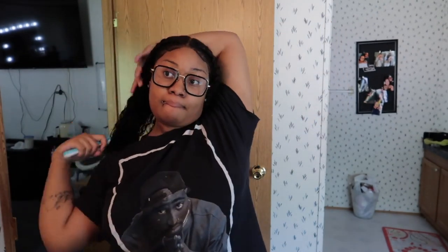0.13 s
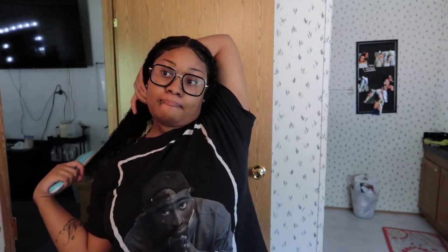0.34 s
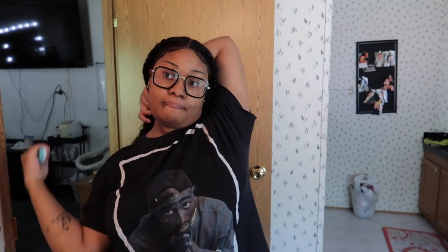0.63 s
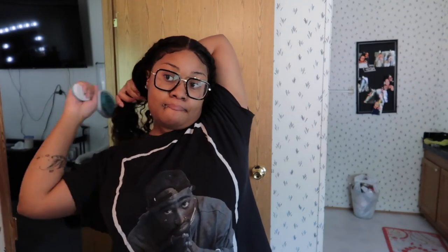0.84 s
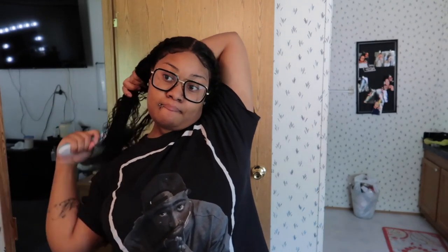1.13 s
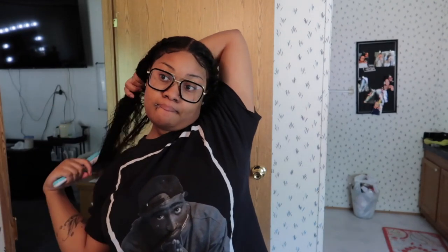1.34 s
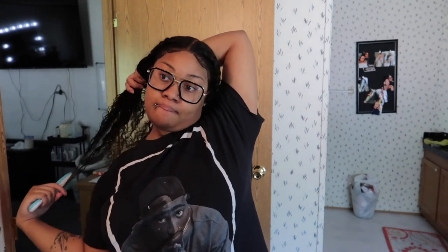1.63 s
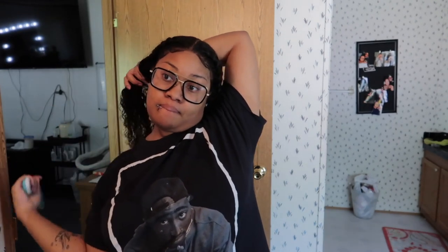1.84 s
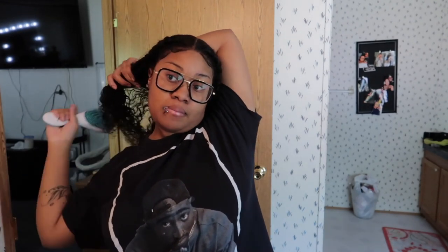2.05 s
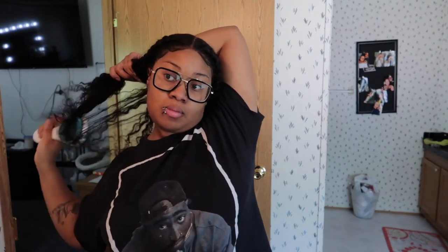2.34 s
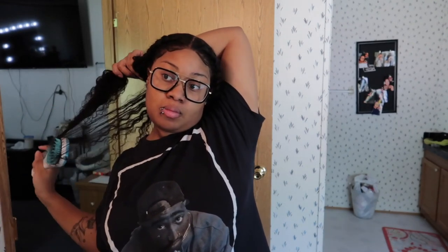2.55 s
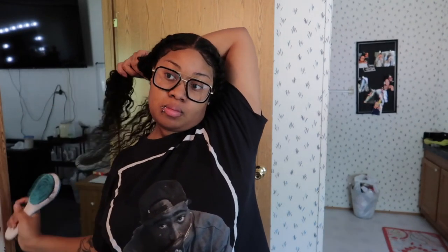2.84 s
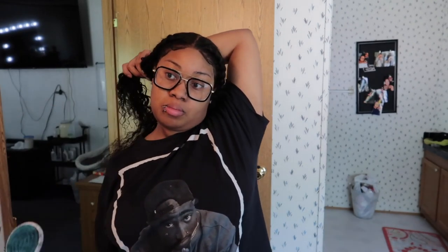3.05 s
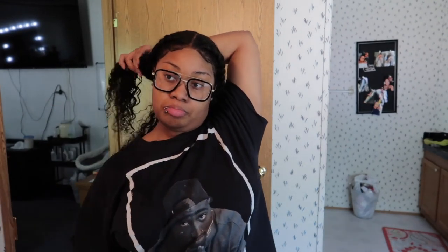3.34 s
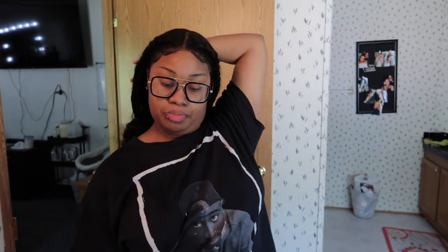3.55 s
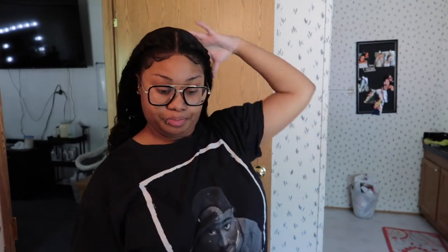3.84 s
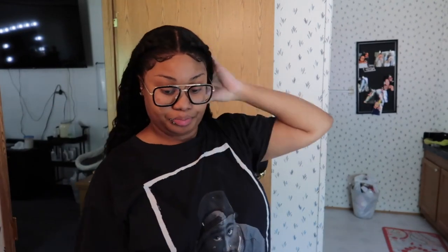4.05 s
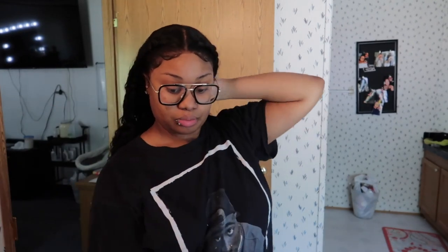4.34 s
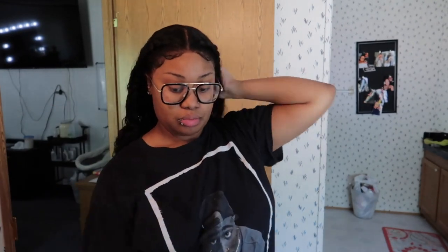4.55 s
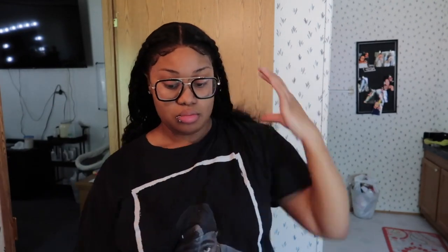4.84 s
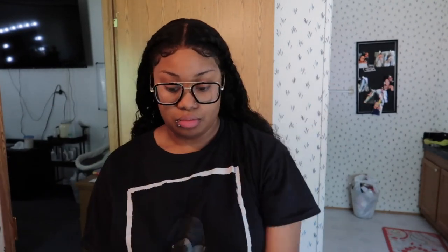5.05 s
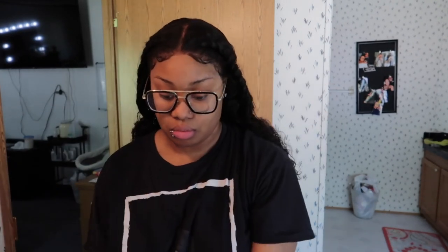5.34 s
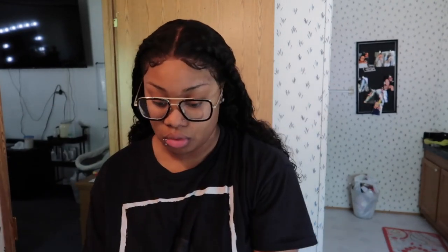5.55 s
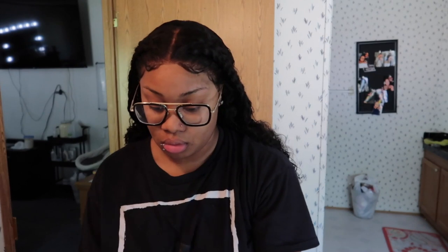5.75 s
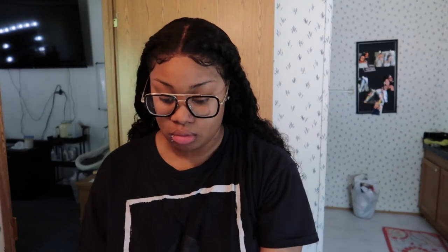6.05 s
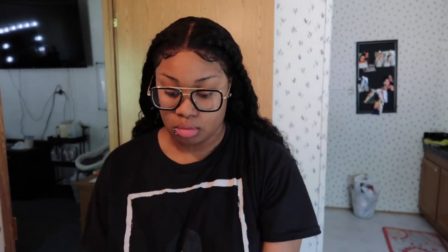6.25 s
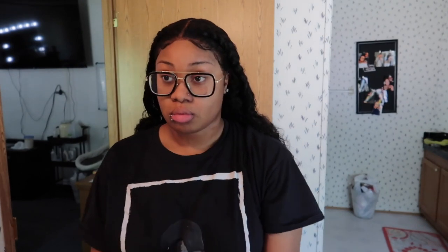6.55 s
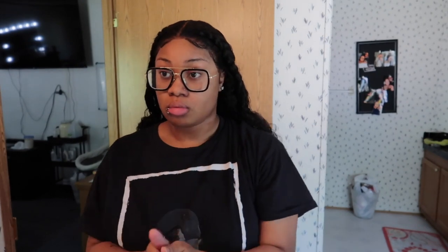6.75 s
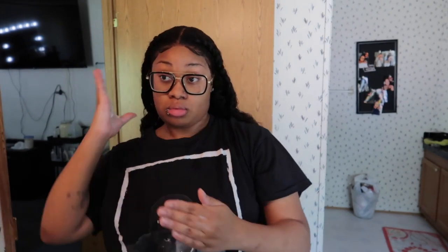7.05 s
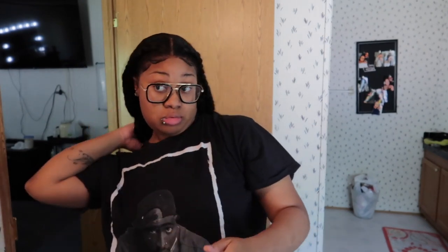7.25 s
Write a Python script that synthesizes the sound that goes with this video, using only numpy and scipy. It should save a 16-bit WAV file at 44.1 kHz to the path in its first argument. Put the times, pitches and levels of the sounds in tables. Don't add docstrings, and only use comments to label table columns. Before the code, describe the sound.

A brush rasps and snags through long hair in short strokes, clacks loudly onto a hard top, then a plastic bottle is tapped over low hum.

```python
import sys
import numpy as np
from scipy import signal
from scipy.fft import rfft, irfft, next_fast_len
from scipy.io import wavfile
from scipy.ndimage import map_coordinates

SR = 44100
rng = np.random.default_rng(int(sys.argv[2]) if len(sys.argv) > 2 else 0)


def materialize(psi):
    bounded = np.clip(np.atleast_2d(psi).T, -1, 1)
    quanta = np.round(bounded * 32767).astype(np.int16)
    wavfile.write(sys.argv[1], SR, quanta)


def boost_factor(decibels):
    exponent = np.asarray(decibels, float) / 20
    return 10 ** exponent


N = 325887

# full_grip_s, hold_s, scrape_db, body_re_scrape_db, hiss_re_scrape_db
BRUSH_PULLS = [(.03, .19, -53, 0.5, -4.5), (.322, 0.0087, -48.5, -9, -4.5), (.36, .015, -43.5, -18, -17),
               (.388, 0.0037, -44.5, 1.5, -3), (.42, 0.048, -54.5, 1, -9), (.974, 0.014, -49.5, -1, -5.5),
               (1.01, 0.17, -58.5, 2.5, -1), (1.22, 0.057, -48.5, -5, -5), (1.31, 0.068, -49, -0.5, -8.5),
               (1.386, 0.02, -40.5, -4.5, -13), (1.45, 0.034, -49.5, 2, -6), (1.53, .16, -56.5, -5, -11),
               (2.3, .01, -54.5, -13, -3), (2.338, 0.0087, -44, 0, -4), (2.365, 0.039, -47, 5, -14),
               (2.41, 0.035, -45, 4.5, -9), (2.48, 0.061, -55.5, 0, -6.5), (2.64, 0.029, -59.5, -5, -9),
               (2.698, .005, -51.5, -5, -3), (2.758, 0.014, -43.5, 1, -10), (4.006, 0.061, -65.5, 2, -10),
               (4.33, .005, -58, -7, -19)]
# center_hz, width_hz, level_db
BRISTLE_PEAKS = [(2450, 420, 12), (2900, 900, 12), (3395, 1060, 7), (1690, 710, 2)]
# center_hz, width_hz, level_db
PADDLE_PEAKS = [(650, 260, 0), (1050, 380, -2)]
# freq_hz, density_db_per_hz
HAIR_HISS = [(2240, -32), (3800, -12.5), (5080, -14), (5940, -14.5), (9400, -19.5), (12600, -18),
             (14400, -35), (15200, -67)]
# start_s, peak_db, pitch_hz, body_re_peak_db, body_hz
SNAGS = [(0.32, -50, 2700, -11, 560), (0.3674, -32, 2230, -2, 990), (0.385, -30, 2900, -9, 616),
         (0.9696, -55, 2500, -8, 950), (1.2185, -44, 2470, -14, 628), (1.3453, -37, 2750, 1, 610),
         (1.3997, -35, 2950, -2, 790), (1.4597, -34, 2900, -10, 910), (1.679, -39, 2456, -19, 740),
         (2.3077, -43, 2950, 6, 706), (2.3287, -28.5, 2800, -1, 730), (2.374, -29.5, 2330, -9, 960),
         (2.414, -30.5, 1640, 6, 1100), (2.441, -37, 3000, -11, 1080), (2.7003, -28, 2260, -9, 686),
         (2.7503, -32, 2570, 5, 1046), (2.9502, -36.5, 3030, -5, 594)]

# full_grip_s, hold_s, rub_db, body_re_rub_db, hiss_re_rub_db
HAND_RUBS = [(4.788, 0.0076, -66, 4, -30), (5.022, .01, -64, 1, -10), (5.688, 0.025, -55, -20, -13),
             (5.76, 0.018, -50, 6.5, -22), (5.79, 0.046, -49, 7, -30), (5.862, .015, -36.5, -1, -38),
             (5.89, 0.017, -39, 2, -34), (5.916, 0.014, -38, -3.5, -29), (6.028, 0.016, -48, 3, -2),
             (6.093, 0.0034, -36, -4, -4.5), (6.115, .03, -59.5, -11, 4), (6.526, 0.1, -58.5, -4, 0.5),
             (6.66, 0.047, -58, -5, 5), (6.712, 0.016, -52.5, -7, 1.5), (6.814, 0.0086, -53.5, -3, 0),
             (6.86, 0.086, -56.5, -3, -2.5), (7.238, 0.092, -68.5, -1, 2)]
# center_hz, width_hz, level_db
BOTTLE_PEAKS = [(1950, 300, 0), (2400, 400, -2), (3400, 700, -17)]
# center_hz, width_hz, level_db
HOLLOW_PEAKS = [(440, 280, 3.5), (840, 370, 3), (1240, 210, 2.5)]
# freq_hz, density_db_per_hz
SKIN_HISS = [(2240, -9.5), (3800, -3), (4520, -9), (6710, -10), (10000, -14), (11800, -22), (14000, -24),
             (15200, -31)]
# start_s, peak_db, pitch_hz, body_re_peak_db, body_hz
TAPS = [(4.792, -35, 1710, -0.5, 1320), (5.0265, -42, 2540, -13, 674), (5.6845, -36.5, 2680, -6, 720),
        (5.7632, -46, 2000, -12, 715), (5.7858, -26.5, 1900, -15, 1370), (5.8573, -22, 2080, -7, 795),
        (6.0148, -38, 3220, 16.5, 1127), (6.0273, -33, 3090, -1, 1190), (6.5258, -49, 2000, -11, 574),
        (6.5427, -36.5, 1760, -16, 1147), (6.807, -33.5, 1960, -0.5, 680)]
# start_s, length_s, pitch_hz, glide_hz, stutter_per_s, level_db
SQUEAKS = [
    (6.012, .06, 3280, -150, 60, -39),
    (6.822, .035, 3350, 250, 50, -47),
    (4.005, .11, 2180, -30, 18, -57),
]

# start_s, peak_db
BLOWS = [
    (4.4259, -2.5),
    (4.4365, -21),
    (4.4479, -20.5),
]
# freq_hz, level_db, t60_s
PLASTIC_MODES = [(256, -20.5, 0.091), (315, -15.5, 0.065), (420, -9.5, 0.062), (533, -15, 0.083),
                 (690, -10.5, 0.036), (850, 1.5, 0.013), (946, 11, 0.017), (1117, -6, 0.033),
                 (1310, -7, 0.017), (1530, -11, 0.0086), (2360, -17.5, 0.035), (2820, 1, 0.014),
                 (3160, -11.5, 0.018), (3800, -15.5, 0.015)]
# freq_hz, level_db, t60_s
PIN_MODES = [(5556, 0, .35), (5571.4, -1, .35)]
# start_s, peak_db
SET_DOWN = [
    (6.0825, -26.5),
    (6.0973, -40.5),
]
# freq_hz, level_db, t60_s
BASE_MODES = [(162, -1, 0.13), (238, -2, 0.057), (302, 4, 0.082), (623, -13, 0.023), (1110, 7, 0.012),
              (1920, -8, 0.023), (2570, 4.5, 0.017), (2950, 0, 0.023)]
# freq_hz, density_db_per_hz
CRACK = [(120, -45), (300, -13), (700, 1.5), (1400, 4), (2200, -11), (3200, -11), (4500, -15.5),
         (7500, -19.5), (9000, -34), (15000, -46)]
# start_s, peak_db, pitch_hz, length_s
THUDS = [
    (5.354, -33, 147, 0.038),
    (5.685, -31, 139, 0.042),
    (5.753, -31, 125, 0.033),
]

# freq_hz, t60_s
WALL_DECAY = [(150, 0.75), (400, 0.46), (1000, 0.29), (3000, 0.28), (8000, 0.11)]
# freq_hz, side_minus_mid_db
ECHO_WIDTH = [(60, -15), (110, -8), (200, -31), (380, -36), (690, -18), (1280, -9.5), (2360, -19),
              (4340, 5.5), (8010, 0), (14800, 0)]
# freq_hz, density_db_per_hz
FADING_KNOCK = [(150, -49), (250, -24), (304, -16), (381, -32), (448, -7), (527, -9.5), (842, 0),
                (1260, -21), (2620, -12.5), (3280, -31), (4840, -34), (12000, -56), (15600, -82),
                (22000, -120)]

# time_s, pitch_hz, level_db
MOTOR = [(0.0, 122.5, -49.7), (0.493, 121.35, -48.5), (0.985, 123.37, -57.1), (1.478, 124.01, -54.4),
         (1.971, 123.54, -55.9), (2.463, 124.34, -53.7), (2.956, 123.23, -46.9), (3.449, 123.33, -78.4),
         (3.941, 121.57, -47.5), (4.434, 124.46, -46.7), (4.927, 124.47, -46.5), (5.419, 125.06, -51.0),
         (5.912, 125.08, -52.1), (6.405, 122.97, -50.1), (6.897, 124.64, -50.7), (7.39, 124.75, -52.8)]
# pitch_hz, level_db
WHINE = (11450, -91)
# center_hz, width_hz, level_db
DRONES = [(39, 7, -60.5), (55.2, 8.1, -52), (88.26, 1.1, -54), (223.9, 15.4, -59), (468.6, 5.4, -61),
          (721, 8.8, -70.5), (1069, 10.5, -68)]
# freq_hz, density_db_per_hz
AIR = [(15, -43), (25, -24), (43, -8), (115, -7.5), (151, -7.5), (214, -10), (258, -10.5), (287, -9),
       (356, -12.5), (465, -11), (592, -18), (2390, -27.5), (11000, -47.5), (15200, -64)]
# freq_hz, side_minus_mid_db
AIR_WIDTH = [(60, -27), (95, -17), (150, -11), (240, -9.5), (380, -8), (590, -9.5), (940, -6.5),
             (1490, -7.5), (2360, -9), (3730, -4), (5900, -2.5), (9330, -6), (14800, 2)]


def unit(x):
    return x / np.sqrt(np.mean(x ** 2) + 1e-20)


def along(points, hz):
    f, v = np.transpose(points)
    return np.interp(np.log(hz + 1), np.log(f + 1), v)


def wobble(knots_per_s):
    knots = rng.standard_normal(int(N * knots_per_s / SR) + 4)
    return map_coordinates(knots, [np.arange(N) * knots_per_s / SR])


def filtered(x, response):
    m = next_fast_len(N + SR // 2)
    return irfft(rfft(x, m) * response(np.fft.rfftfreq(m, 1 / SR)), m)[..., :N]


def coloured(spectrum, channels=1):
    noise = rng.standard_normal((channels, N))
    return unit(filtered(noise, lambda hz: boost_factor(along(spectrum, hz))))


def resonant(x, peaks):
    def response(hz):
        total = 0
        for k, (center_hz, width_hz, db) in enumerate(peaks):
            damping = 1j * hz * width_hz
            total = total + (-1) ** k * boost_factor(db) * damping / (center_hz ** 2 - hz ** 2 + damping)
        return total
    return unit(filtered(x, response))


def ring(modes, rise_s):
    t = np.arange(SR // 2) / SR
    tones = sum(boost_factor(db - 60 * t / t60_s) * np.sin(2 * np.pi * hz * t) for hz, db, t60_s in modes)
    return tones * (1 - np.exp(-t / rise_s))


def add(track, start_s, sound):
    track[round(start_s * SR):][:len(sound)] += sound


def spread(mid, side, width, side_db):
    side = filtered(side, lambda hz: boost_factor(along(width, hz) + side_db))
    return np.array([mid + side, mid - side])


def gestures(rows, grip_db_per_s, release_db_per_s):
    power, t = np.zeros((3, N)), np.arange(N) / SR
    for start_s, hold_s, db, body_db, hiss_db in rows:
        near = slice(max(round((start_s - .25) * SR), 0), round((start_s + hold_s + .4) * SR))
        before_s = np.maximum(start_s - t[near], 0)
        after_s = np.maximum(t[near] - start_s - hold_s, 0)
        shape_db = -grip_db_per_s * before_s - release_db_per_s * after_s
        power[:, near] += boost_factor(db + shape_db + np.array([[0], [body_db], [hiss_db]])) ** 2
    return np.sqrt(power)


def slips(rate_per_s, scatter_db, clump_db):
    sizes = boost_factor(scatter_db * np.minimum(rng.exponential(1, N), 3)) * rng.standard_normal(N)
    happens = rng.random(N) < rate_per_s / SR
    grains = unit(sizes * happens) + 0.54 * rng.standard_normal(N)
    return grains * boost_factor(clump_db * wobble(35))


def friction(gains, scrape_peaks, body_peaks, hiss_colour):
    scrape_gain, body_gain, hiss_gain = gains
    scrape = resonant(slips(1100, scatter_db=4.2, clump_db=2.8), scrape_peaks)
    body = resonant(slips(2500, scatter_db=2.2, clump_db=1.5), body_peaks)
    fine = slips(6000, scatter_db=5.5, clump_db=2.3)
    hiss = unit(filtered(fine, lambda hz: boost_factor(along(hiss_colour, hz))))
    return scrape_gain * scrape + body_gain * body + hiss_gain * hiss


def brush():
    gains = gestures(BRUSH_PULLS, grip_db_per_s=460, release_db_per_s=330)
    return friction(gains, BRISTLE_PEAKS, PADDLE_PEAKS, HAIR_HISS)


def snags_and_taps():
    out = np.zeros(N + SR)
    bunch = np.array([-1.6, -.9, -.3, .3, .9, 1.6, -1, -.3, .4, 1.1])
    for start_s, db, hz, body_db, body_hz in SNAGS + TAPS:
        detune = bunch + 0.37 * rng.standard_normal(10)
        tips = [(hz * (1 + .12 * d), -3 * abs(d), .024) for d in detune[:6]]
        body = [(body_hz * (1 + .15 * d), body_db - 3 * abs(d), .03) for d in detune[6:]]
        add(out, start_s, boost_factor(db - 3.5) * ring(tips + body, rise_s=0.0024))
    return out[:N]


def contacts(blows, modes, rise_s, crack_db, crack_t60_s):
    out, t = np.zeros(N + SR), np.arange(SR // 2) / SR
    broad = coloured(CRACK)[0]
    crack_shape = boost_factor(crack_db - 60 * t / crack_t60_s) * (1 - np.exp(-t / 0.00012))
    for start_s, db in blows:
        crack = crack_shape * broad[round(start_s * SR):][:len(t)]
        add(out, start_s, boost_factor(db) * (ring(modes, rise_s) + crack))
    return out[:N]


def brush_drop():
    return contacts(BLOWS, PLASTIC_MODES, rise_s=0.0028, crack_db=-9.5, crack_t60_s=0.024)


def pins():
    out = np.zeros(N + SR)
    add(out, BLOWS[0][0], boost_factor(-42.5) * ring(PIN_MODES, rise_s=.004))
    return out[:N]


def hands():
    gains = gestures(HAND_RUBS, grip_db_per_s=810, release_db_per_s=700)
    return friction(gains, BOTTLE_PEAKS, HOLLOW_PEAKS, SKIN_HISS)


def bottle_set_down():
    return contacts(SET_DOWN, BASE_MODES, rise_s=0.0006, crack_db=-6, crack_t60_s=0.053)


def squeaks():
    out = np.zeros(N + SR)
    for start_s, length_s, hz, glide_hz, stutter_per_s, db in SQUEAKS:
        t = np.arange(int(length_s * SR)) / SR
        grip = np.abs(np.sin(np.pi * stutter_per_s * t)) * (1 - t / length_s)
        tone = np.sin(2 * np.pi * (hz + glide_hz * t / length_s / 2) * t)
        add(out, start_s, boost_factor(db) * grip * tone)
    return out[:N]


def bumps():
    out = np.zeros(N + SR)
    for start_s, db, hz, length_s in THUDS:
        t = np.arange(int(length_s * SR)) / SR
        add(out, start_s, boost_factor(db) * np.sin(np.pi * t / length_s) * np.sin(2 * np.pi * hz * t))
    return out[:N]


def ports(x, lead_s):
    return filtered(x, lambda hz: np.exp(1j * np.pi * hz * lead_s * np.array([[1], [-1]])))


def room(x, side_db):
    hz, t, z = signal.stft(rng.standard_normal((2, SR // 2)), SR, nperseg=256)
    decay = boost_factor(-60 * t / along(WALL_DECAY, hz)[:, None])
    tail = signal.istft(z * decay, SR, nperseg=256)[1]
    tail = tail / np.linalg.norm(tail[0])
    late = np.pad(x, (400, 0))[None]
    wet = signal.fftconvolve(late, tail, axes=1)[:, :N]
    return spread(wet[0], wet[1], ECHO_WIDTH, side_db)


def earlier_knock():
    t = np.arange(N) / SR
    decay = boost_factor(-39.5 - 60 * t / 0.18) + boost_factor(-32.5 - 60 * t / 0.52)
    mid, side = coloured(FADING_KNOCK, channels=2) * decay
    mode = boost_factor(-47.0 - 60 * t / 1.8) * np.sin(2 * np.pi * 320 * t)
    return spread(mid + mode, side, ECHO_WIDTH, side_db=-5.0)


def hum():
    time_s, pitch_hz, level_db = np.transpose(MOTOR)
    t = np.arange(N) / SR
    mains = boost_factor(-49.5) * np.sin(2 * np.pi * 120.05 * t)
    motor_phase = 2 * np.pi * np.cumsum(np.interp(t, time_s, pitch_hz)) / SR
    motor = np.interp(t, time_s, boost_factor(level_db + 0.4)) * np.sin(motor_phase)
    whine_hz, whine_db = WHINE
    whine = boost_factor(whine_db) * np.sin(2 * np.pi * whine_hz * t)
    tone = np.sqrt(2) * (mains + motor + whine)
    drones = np.zeros(N)
    for center_hz, width_hz, db in DRONES:
        drones += boost_factor(db) * resonant(rng.standard_normal(N), [(center_hz, width_hz, 0)])
    return (tone + drones) * boost_factor([[-.15], [.15]])


def air():
    pair = filtered(rng.standard_normal((2, N)), lambda hz: boost_factor(along(AIR, hz)))
    pair = boost_factor(-49 + 0.067 * wobble(3.53)) * pair / np.std(pair[0])
    return spread(pair[0], pair[1], AIR_WIDTH, side_db=3.5)


def scene():
    small = brush() + hands() + snags_and_taps() + squeaks() + bottle_set_down()
    clack = brush_drop()
    direct = boost_factor(-1.0) * ports(small, lead_s=.000042) + ports(clack + pins(), lead_s=.000045)
    walls = boost_factor(-8.5) * room(small, side_db=-4.7) + boost_factor(-4) * room(clack, side_db=-5.5)
    return direct + walls + bumps() + earlier_knock() + hum() + air()


def top_cut(x):
    return signal.sosfilt(signal.butter(12, 15360, fs=SR, output="sos"), x)


def record(dry):
    return top_cut(dry)


dry = scene()
out = record(dry)
materialize(out)
```